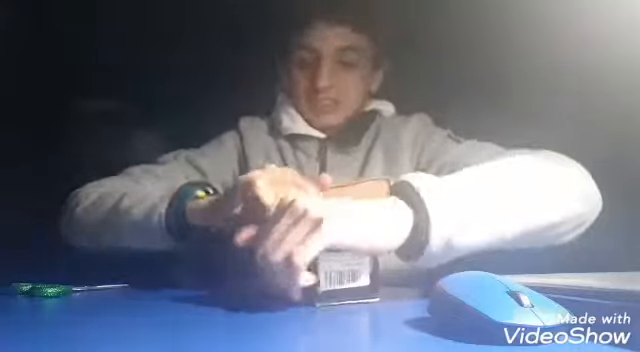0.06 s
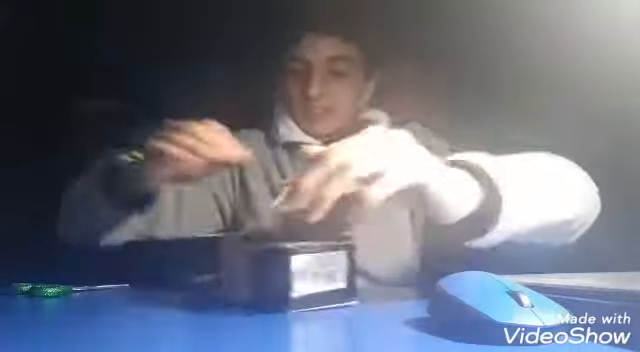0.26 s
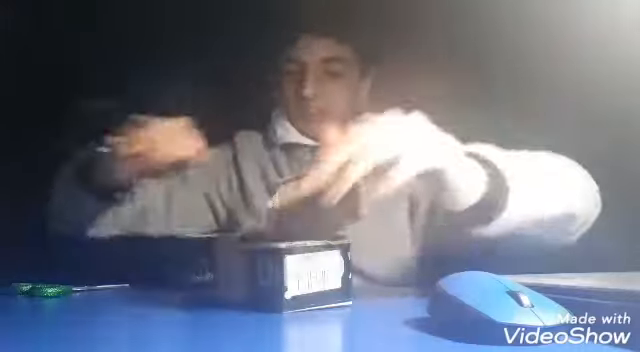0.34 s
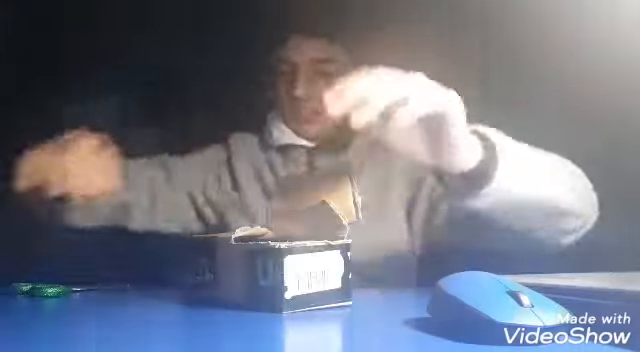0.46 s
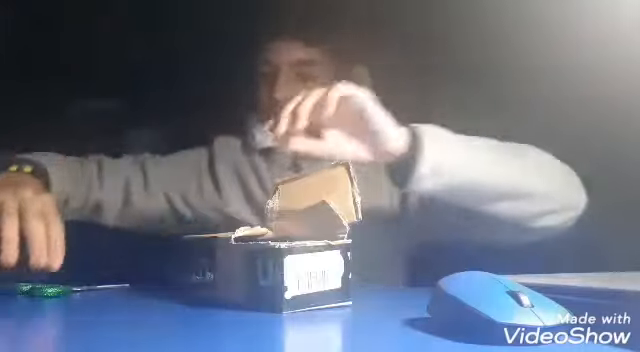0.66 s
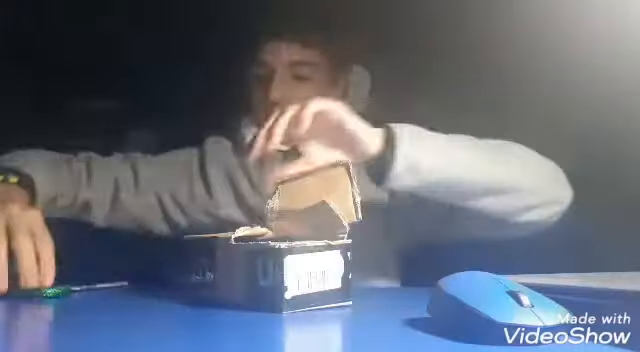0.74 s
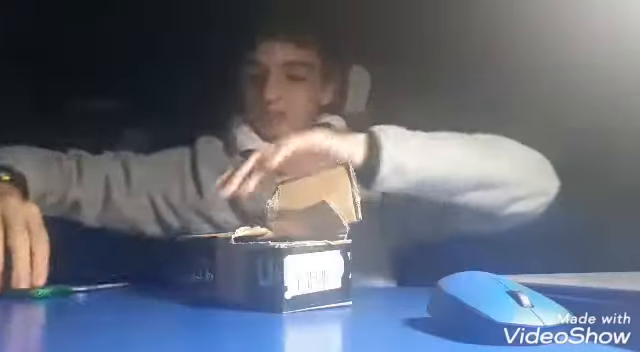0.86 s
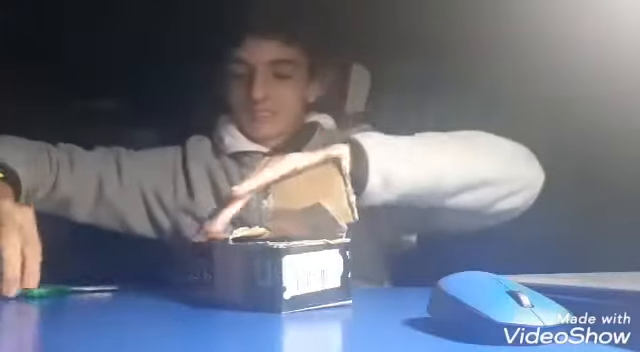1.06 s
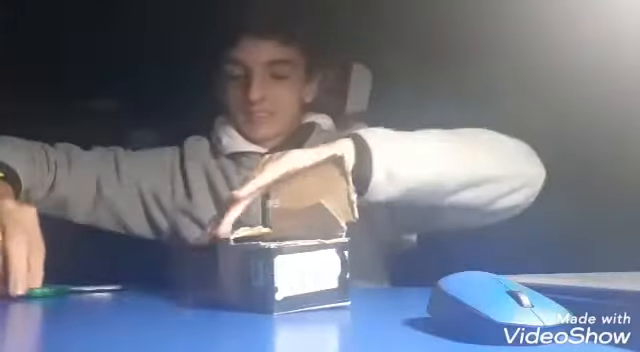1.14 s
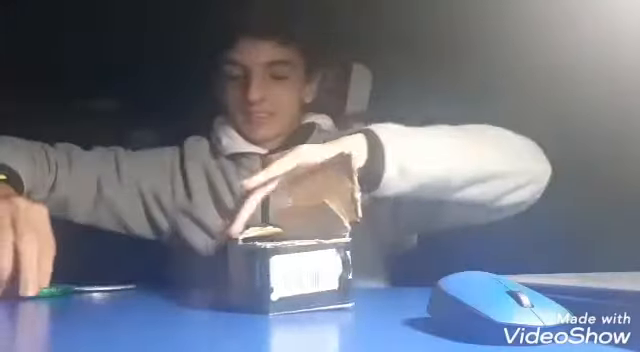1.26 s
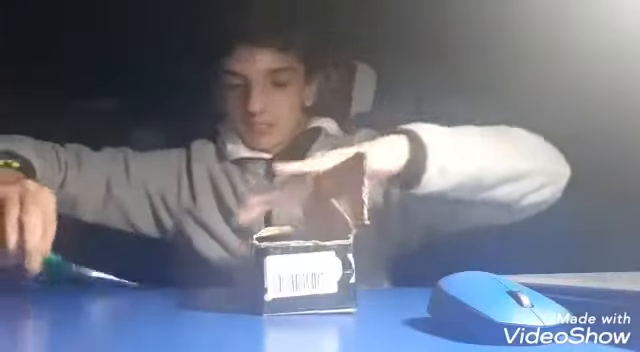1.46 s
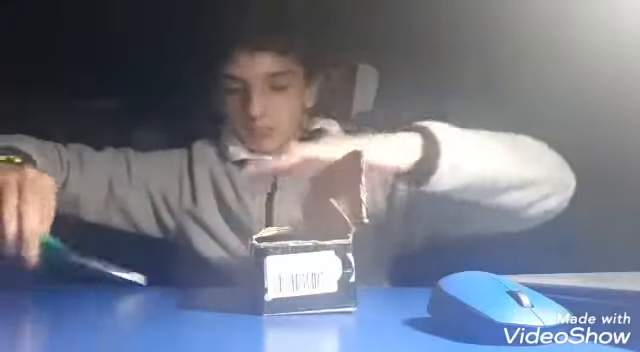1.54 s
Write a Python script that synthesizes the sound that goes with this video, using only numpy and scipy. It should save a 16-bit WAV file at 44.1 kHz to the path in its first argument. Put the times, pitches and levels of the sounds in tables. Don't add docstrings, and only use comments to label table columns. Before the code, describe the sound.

A small cardboard box ticks, creaks and rips, slamming hollowly on a tabletop; after a brief lull, scissors rattle, knock and scrape before being lifted. Close stereo phone microphone in a small live room.

```python
import sys
import numpy as np
from scipy import signal
from scipy.fft import rfft, irfft
from scipy.io import wavfile

SR = 44100
rng = np.random.default_rng(int(sys.argv[2]) if len(sys.argv) > 2 else 0)


def pcm_store(signal):
    levels = np.round(np.clip(np.atleast_2d(signal), -1, 1) * 32767)
    wavfile.write(sys.argv[1], SR, levels.astype(np.int16).T)


def elevation(decibels):
    levels = np.asarray(decibels, float)
    return 10 ** (levels / 20)


N = 70560
T = np.arange(N) / SR

# freq_hz, density_db [dB per Hz]
FLOOR_SPECTRUM = [(40, 14), (120, 11), (2500, -11), (5000, -28.5), (7500, -43), (11000, -55.5)]
FLOOR_DB = -66.5
# centre_hz, width_hz, level_db
SLEEVE_EFFORT = [(0, -65), (.055, -60), (.1, -48), (.2, -46.5), (.225, -35.5), (.24, -41), (.3, -24.5),
                 (.36, -32.5), (.45, -49), (.6, -58), (.75, -76), (1.065, -80), (1.085, -45), (1.15, -52.5),
                 (1.4, -52.5), (1.57, -54), ]
CLOTH_TONE = [(390, 360, -2.5), (1000, 960, 3.5), (2520, 1170, 1), (4000, 2170, 0.5), (8300, 9300, -2.5)]
# start_s, peak_db, pitch_hz, t60_s
TAPE_TICKS = [
    (.0055, -26.5, 6420, 0.0047),
    (0.0331, -24.5, 4950, 0.0062),
    (.048, -24.5, 4180, 0.0045),
    (0.145, -24.5, 5230, 0.0051),
    (0.148, -37, 4300, 0.007),
    (0.161, -26.5, 4710, 0.006),
    (.153, -29, 4600, 0.0069),
]
# centre_hz, width_hz, level_db
HISS_LEVEL = [(0, -89), (.06, -75), (.085, -59), (.2, -52.5), (.225, -45.5), (.25, -57.5), (.295, -43),
              (.34, -54), (.37, -100), (1.52, -86), (1.545, -57), (1.572, -57.5), (1.578, -70), (1.6, -77)]
HISS_TONE = [(6000, 4000, 0.5), (11100, 3100, 20)]
# mode_hz, level_db, t60_s
TABLE_PUSHES = [(0.093, -43), (.165, -48.5), (0.245, -25), (.289, -13), (0.331, -36.5), (.42, -38.5),
                (0.499, -45), (0.799, -47), (1.073, -44.5), (1.389, -58), (1.511, -47)]
TABLE_MODES = [(97.8, 2.5, 0.19), (128, -10, 0.38), (174.15, -5, 0.2), (242, -12, 0.18), (103.6, -10, 0.23)]
PUSH_S, TABLE_SCATTER_DB = 0.016, 2.1
# time_s, level_db
CREAK_EFFORT = [
    (.125, -74.5),
    (.146, -45.5),
    (.2, -35),
    (.225, -36.5),
    (.24, -54.5),
    (.28, -23.5),
    (.3, -87.5),
]
# centre_hz, width_hz, level_db
FLAP_TONE = [(650, 196, -5), (1420, 120, -10), (2500, 510, -15.5), (4600, 2100, -15.5)]
# start_s, length_s, level_db, from_hz, to_hz
SQUEAK_SLIPS = [
    (.143, 0.018, -31, 650, 650),
    (0.165, 0.021, -37, 659, 640),
    (.204, 0.015, -29, 676, 690),
    (.93, 0.12, -46, 500, 514),
    (1.05, 0.015, -34.5, 562, 560),
    (1.477, 0.048, -34, 853, 729),
]
# start_s, peak_db, pitch_hz, crack_db
BOX_HITS = [(.2195, -16.5, 1560, -14.5), (.2465, -15, 231, -26.5), (.2485, -12.5, 1140, -2.5),
            (.2523, -12.5, 2350, -8.5), (.2528, -4.5, 2450, -18), (.2555, -19, 2980, -6.5),
            (.2702, -18.5, 537, -9.5), (.277, -18, 420, -30), (.2876, -5, 381, -21),
            (.292, -10.5, 577, -26.5), (.2945, -8, 1430, -7.5), (.2975, -14, 2550, -2.5),
            (.301, -7, 1160, -6.5), (.309, -24.5, 534, -32.5), (.321, -16.5, 634, -15),
            (.3125, -19, 3020, -17), (.3225, -19, 4130, -5.5), (.333, -22, 1500, -15.5),
            (.3425, -17, 2680, -5), (.349, -25.5, 1620, -1.5), (.355, -16, 2500, -9), (.369, -33, 725, -19),
            (.387, -20.5, 1290, -13), (.4045, -21.5, 1470, -14.5), (.455, -38, 466, -17)]
# centre_hz, width_hz, level_db
BOX_MODES = [(205, -2.5, 0.012), (324, -32, 0.023), (509.2, -13, 0.099), (640, -10, 0.072),
             (840, 0.5, 0.016), (1230, -3, 0.035), (1476, -9, 0.058), (2000, -16, 0.11),
             (2550, -20.5, 0.014)]
BOX_CRACK = [(2500, 2670, 11.5), (4540, 1330, -0.5)]
# time_s, level_db
CREEP_EFFORT = [
    (.4, -73),
    (.45, -50),
    (.55, -55),
    (.62, -58.5),
    (.7, -67.5),
    (.74, -90),
]
# centre_hz, width_hz, level_db
CREEP_TONE = [(658, 70, -3), (2240, 340, -7), (2740, 83, -6), (3940, 350, -3)]
# start_s, peak_db, pitch_hz, crack_db
SCISSOR_HITS = [(.8146, -10, 993, -30), (.8195, -13, 1330, -39), (.8376, -14.5, 640, -24),
                (.843, -45, 590, -66), (.8573, -19, 890, -18.5), (.863, -12.5, 920, -50),
                (.879, -16.5, 970, -28), (.9, -20, 940, -17), (.9854, -30, 1110, -26),
                (1.0039, -32, 630, -19), (1.0238, -28, 2390, -22.5), (1.0465, -18, 1000, -26),
                (1.0762, -15.5, 1290, -8.5), (1.0768, -20.5, 218, -39), (1.0793, -16.5, 740, -5.5),
                (1.099, -14.5, 830, -44), (1.1135, -28.5, 800, -22), (1.3097, -17, 1190, -16),
                (1.312, -15, 685, -16), (1.331, -24.5, 650, -11), (1.3892, -27, 900, -5),
                (1.392, -22.5, 237, -4.5), (1.406, -24.5, 224, -21), (1.4445, -23.5, 1146, -37),
                (1.5117, -10.5, 1320, -16.5), (1.521, -20.5, 225, -34)]
# centre_hz, width_hz, level_db
SCISSOR_MODES = [(442, -24, 0.13), (548, -13, 0.066), (638.4, -9.5, 0.061), (790, -46, 0.028),
                 (942, -12.5, 0.05), (1157, -5.5, 0.032), (1393, -10.5, 0.04), (1806, -2, 0.013),
                 (2500, -4, 0.014), (3190, -16, 0.019)]
STEEL_CRACK = [(2076, 850, 19.5), (3276, 850, 13.5), (5860, 1600, -1.5)]
HIT_SCATTER_DB = 2.5
HANDLE_HZ = 5290
# centre_hz, width_hz, level_db
SLIDE_EFFORT = [(.8, -64), (.82, -41.5), (.92, -46.5), (.97, -68), (1.02, -53), (1.035, -43.5),
                (1.065, -42), (1.11, -41.5), (1.2, -60), (1.3, -65), (1.315, -37.5), (1.36, -58),
                (1.41, -45), (1.44, -47), (1.47, -44.5), (1.5, -46), (1.53, -57), (1.6, -75)]
DRAG_TONE = [(520, 90, -3), (780, 150, 0), (1100, 500, -2), (2400, 1500, -13)]
# time_s, level_db
LEAN_EFFORT = [
    (.8, -93),
    (.83, -61),
    (1.05, -59.5),
    (1.35, -54.5),
    (1.6, -55),
]
# centre_hz, width_hz, level_db
RASP_EFFORT = [(.81, -102), (.82, -62), (.91, -55), (.95, -100), (1.02, -53), (1.07, -71), (1.09, -85),
               (1.39, -78), (1.405, -44), (1.42, -55), (1.44, -82), (1.46, -48.5), (1.5, -36.5),
               (1.515, -45), (1.535, -52.5), (1.565, -50), (1.58, -93)]
EDGE_TONE = [(2480, 230, -0.39), (3550, 120, -1.5)]
# start_s, peak_db, low_ring_hz, low_ring_db
BLADE_CLINKS = [(1.0759, -19.5, 2430, 0), (1.0766, -11.5, 2090, -9), (1.1135, -40.5, 5060, 2),
                (1.3097, -28.5, 2500, 9), (1.3889, -21, 1830, 2), (1.3898, -22, 1820, -7),
                (1.4041, -33, 1820, 5.5), (1.5137, -35, 1390, 0), (1.521, -26, 2000, -18),
                (1.538, -43, 2000, -14), (1.5605, -32.5, 2070, 6)]
# mode_hz, level_db, t60_s
STEEL_MODES = [(3290, 1.5, 0.0088), (3760, -26.5, 0.0041), (4800, -12, 0.0063), (5900, -13, 0.0052),
               (7100, -13, 0.0032), (11100, -30, 0.0026), (13300, -50, .003)]
CLINK_RISE_S, CLINK_LOW_T60_S = 0.00023, 0.016
# centre_hz, t60_s, level_db
ROOM_BANDS = [(110, .45, -9), (300, 0.45, -1.5), (800, 0.37, -8.5), (2000, 0.65, -15), (4300, 0.5, -16),
              (8650, 0.54, -17)]
BOX_PAN_DB, SCISSOR_PAN_DB, STEEL_PAN_DB = -2.7, -2.8, -4.5
SCISSOR_LAG_S = .000186
BOX_BOUNCE_DB, STEEL_BOUNCE_DB = -2.5, -15
DULL_HZ = 11700
OPPOSITE = np.array([[1], [-1]])


def unit(x):
    return x / np.sqrt(np.mean(x ** 2, axis=-1, keepdims=True))


def band(x, hz, width):
    return signal.lfilter(*signal.iirpeak(min(hz, .45 * SR), hz / width, fs=SR), x)


def band_twice(x, hz, width):
    return band(band(x, hz, width), hz, width)


def decay(t, t60):
    return np.exp(-np.log(1000) * t / t60)


def ring(t, hz, t60):
    return np.sin(2 * np.pi * hz * t) * decay(t, t60)


def add(out, s, x):
    i = int(s * SR)
    out[i:i + len(x)] += x[:N - i]


def floor():
    f = np.maximum(np.arange(N // 2 + 1) * SR / N, 1)
    hz, db = np.array(FLOOR_SPECTRUM).T
    colour = elevation(np.interp(np.log(f), np.log(hz), db))
    mid, side = irfft(rfft(rng.standard_normal((2, N))) * colour, N)
    return elevation(FLOOR_DB) * unit(mid + 0.38 * side * OPPOSITE)


def rub(effort, peaks, rate, spread_db):
    happens = rng.random(N) < rate / SR
    strength = elevation(spread_db * np.minimum(rng.exponential(size=N), 3))
    slips = happens * strength * rng.standard_normal(N)
    tone = sum(elevation(db) * unit(band_twice(slips, hz, 1.68 * w)) for hz, w, db in peaks)
    s, db = np.array(effort).T
    return unit(tone) * elevation(np.interp(T, s, db, left=-120, right=db[-1]))


def sleeve_rustle():
    sides = np.array([rub(SLEEVE_EFFORT, CLOTH_TONE, 6000, 5.4) for _ in range(2)])
    return (sides + 0.14 * sides[::-1]) * elevation(-1.2 * OPPOSITE)


def tape():
    out, t = np.zeros(N), T[:SR // 30]
    for s, db, hz, t60 in TAPE_TICKS:
        tick = ring(t, hz, t60) + .5 * ring(t, 1.304 * hz, t60)
        tick += 0.88 * ring(t, 0.873 * hz, t60) + .08 * ring(t, 2.1 * hz, t60 / 2)
        add(out, s, elevation(db) * np.minimum(t / 0.00049, 1) ** 2 * tick)
    return out


def high_hiss():
    return np.array([rub(HISS_LEVEL, HISS_TONE, 14000, 1.0) for _ in range(2)])


def table():
    out, t = np.zeros(N), T[:SR // 2]
    for s, db in TABLE_PUSHES:
        mix = rng.standard_normal(len(TABLE_MODES))
        modes = sum(elevation(g + TABLE_SCATTER_DB * v) * ring(t, hz * (1 + .02 * v), t60)
                    for (hz, g, t60), v in zip(TABLE_MODES, mix))
        add(out, s, elevation(db) * np.minimum(t / PUSH_S, 1) * modes)
    return out


def flap_creak():
    return rub(CREAK_EFFORT, FLAP_TONE, 1500, 5.4)


def squeaks():
    out, waver = np.zeros(N), unit(band(rng.standard_normal(N), 110, 57))
    for s, length, db, from_hz, to_hz in SQUEAK_SLIPS:
        u = np.arange(int(length * SR)) / (length * SR)
        w = waver[int(s * SR):][:len(u)]
        hz = (from_hz + (to_hz - from_hz) * u) * (1 + 0.025 * w)
        phase = 2 * np.pi * np.cumsum(hz) / SR
        tone = np.sin(phase) + 0.081 * np.sin(2.4 * phase)
        add(out, s, elevation(db + 2.0 * w) * np.sqrt(np.sin(np.pi * u)) * tone)
    return out


def strikes(rows, modes, cycles, body_db, contact_s, crack_s, colour, snap):
    out, t = np.zeros(N), T[:SR // 8]
    hz, db, t60 = np.array(modes).T[:, :, None]
    mixes = rng.standard_normal((len(rows), len(modes), 2))
    noises = rng.standard_normal((len(rows), len(t)))
    noises[:, 0] = snap
    for (s, peak_db, pitch_hz, crack_db), mix, noise in zip(rows, mixes, noises):
        levels = elevation(db + HIT_SCATTER_DB * mix[:, :1])
        body = (levels * ring(t, hz * (1 + 0.033 * mix[:, 1:]), t60)).sum(axis=0)
        burst = noise * np.exp(-t / crack_s)
        crack = sum(elevation(g) * band_twice(burst, f, w) for f, w, g in colour)
        onset = 1 - np.exp(-(t / contact_s) ** 2)
        rings = (ring(t, pitch_hz, cycles / pitch_hz) + elevation(body_db) * body) * onset
        add(out, s, elevation(peak_db) * (rings + elevation(crack_db) * crack))
    return out


def box_blows():
    return strikes(BOX_HITS, BOX_MODES, cycles=11, body_db=-9.5, contact_s=0.00043, crack_s=0.0022,
                   colour=BOX_CRACK, snap=1.6)


def flap_creep():
    return rub(CREEP_EFFORT, CREEP_TONE, 2500, 3.9)


def scissor_handles():
    x = strikes(SCISSOR_HITS, SCISSOR_MODES, cycles=6.5, body_db=-10, contact_s=0.00046, crack_s=0.0015,
                colour=STEEL_CRACK, snap=2.15)
    x += rub(SLIDE_EFFORT, DRAG_TONE, 3200, 2.9)
    return signal.sosfilt(signal.butter(2, [330, HANDLE_HZ], "band", fs=SR, output="sos"), x)


def forearm_drag():
    return rub(LEAN_EFFORT, [(160, 86, 0)], 2000, 3.1)


def edge_rasp():
    return rub(RASP_EFFORT, EDGE_TONE, 2500, 2.9)


def clinks():
    out, t = np.zeros(N), T[:SR // 40]
    onset = np.sin(np.pi / 2 * np.minimum(t / CLINK_RISE_S, 1)) ** 2
    for s, db, low_hz, low_db in BLADE_CLINKS:
        mix = rng.standard_normal(len(STEEL_MODES))
        modes = sum(elevation(g + 3.9 * v) * ring(t, hz * (1 + 0.012 * v), t60)
                    for (hz, g, t60), v in zip(STEEL_MODES, mix))
        low = elevation(low_db) * ring(t, low_hz, CLINK_LOW_T60_S)
        add(out, s, elevation(db) * onset * (modes + low))
    return out


def place(x, pan_db, lag_s, bounce_db):
    t = T[:SR // 100]
    bounces = rng.standard_normal(len(t)) * np.exp(-t / 0.0022)
    near = signal.fftconvolve(band(x, 2900, 6300), unit(bounces) / np.sqrt(len(t)))[:N]
    near = elevation(bounce_db) * near
    left = np.interp(T - lag_s, T, x + near)
    return np.array([left, x - near]) * elevation(pan_db * OPPOSITE / 2)


def room(x):
    t, echo = T[:SR], 0
    for hz, t60, db in ROOM_BANDS:
        mid, side = (band_twice(rng.standard_normal(SR), hz, 1.14 * hz) for _ in range(2))
        wide = mid + min(hz / 1100.0, 1) * side * OPPOSITE
        tail = wide * decay(t, t60) * np.clip(t / 0.012, 0, 1)
        echo = echo + elevation(db) * tail * np.sqrt(13 / t60 / SR)
    return signal.fftconvolve(x[None], echo, axes=1)[:, :N]


def scene():
    box = tape() + box_blows() + flap_creak() + squeaks() + flap_creep()
    handles = scissor_handles()
    steel = clinks() + edge_rasp()
    sleeves = sleeve_rustle()
    thumps = table() + forearm_drag()
    dull = place(box, BOX_PAN_DB, 0, BOX_BOUNCE_DB)
    dull = dull + place(handles, SCISSOR_PAN_DB, SCISSOR_LAG_S, STEEL_BOUNCE_DB)
    dull = dull + thumps + sleeves
    dull = dull + room(box + handles + steel + thumps + sleeves[0]) + floor()
    dull = signal.sosfilt(signal.cheby2(6, 25, DULL_HZ, fs=SR, output="sos"), dull)
    return dull + place(steel, STEEL_PAN_DB, SCISSOR_LAG_S, STEEL_BOUNCE_DB) + high_hiss()


def low_pass(x):
    return signal.sosfilt(signal.butter(12, 16440, fs=SR, output="sos"), x)


def record(dry):
    x = signal.sosfilt(signal.butter(2, 55, "high", fs=SR, output="sos"), dry)
    x = signal.sosfilt(signal.cheby2(8, 50, 16700, fs=SR, output="sos"), x)
    return low_pass(np.tanh(0.88 * x) / 0.74)


dry = scene()
out = record(dry)
pcm_store(out)
```